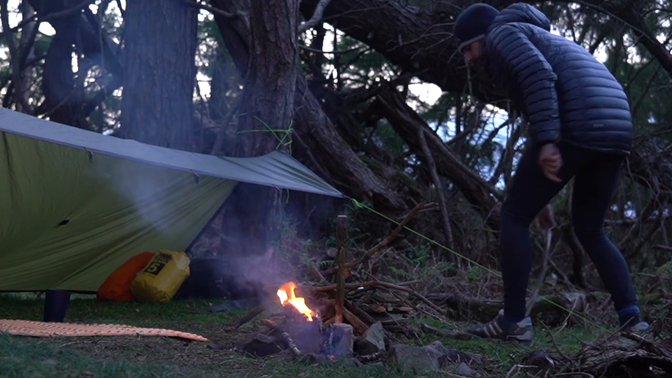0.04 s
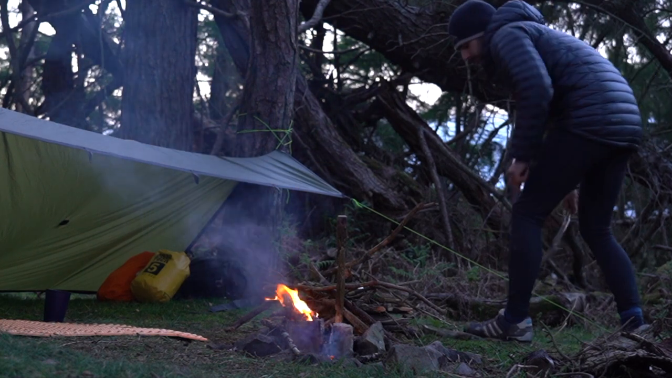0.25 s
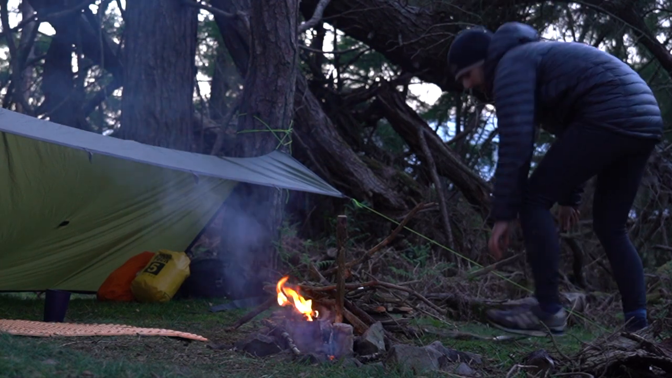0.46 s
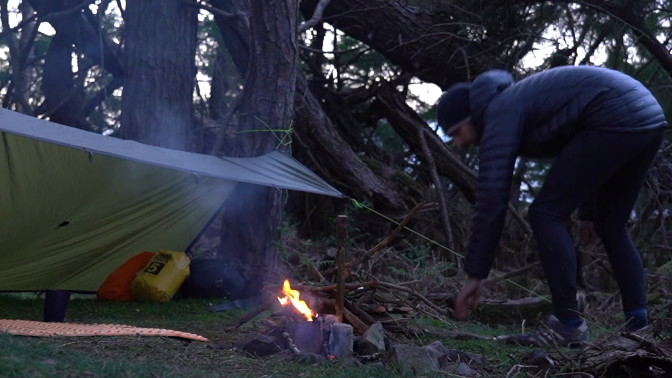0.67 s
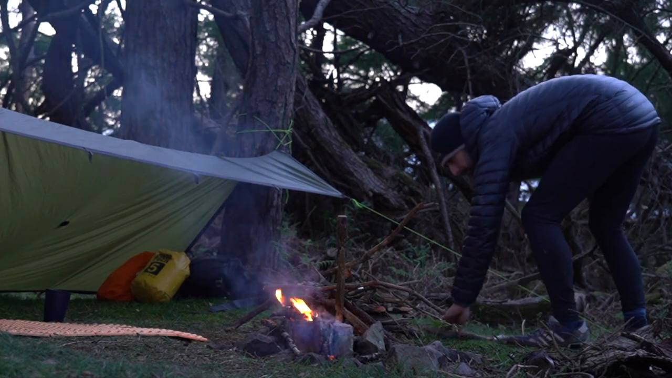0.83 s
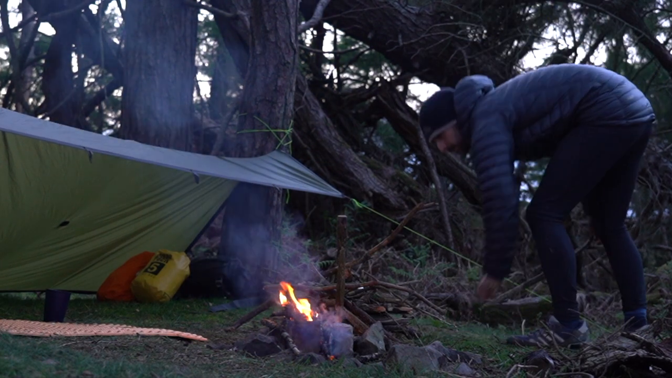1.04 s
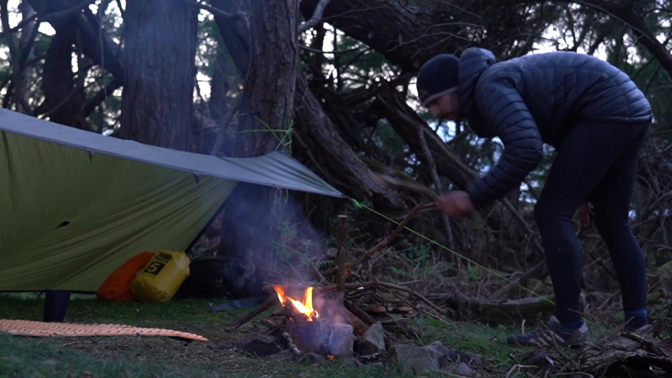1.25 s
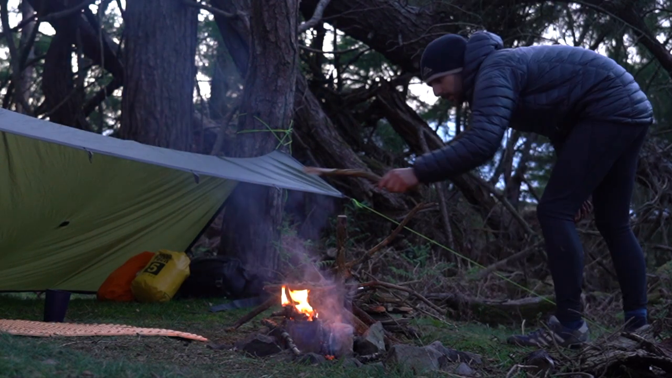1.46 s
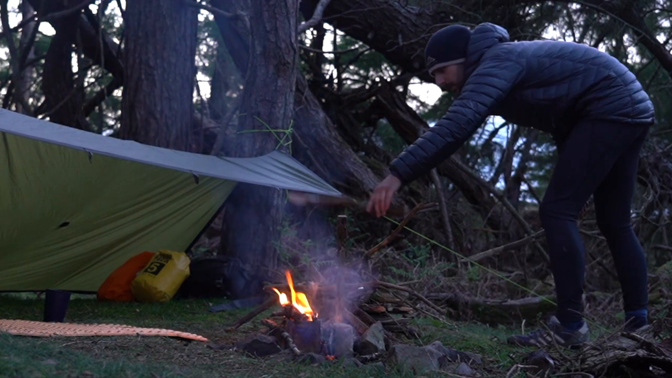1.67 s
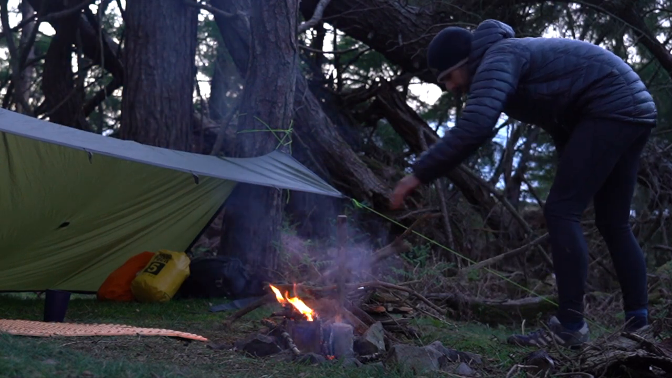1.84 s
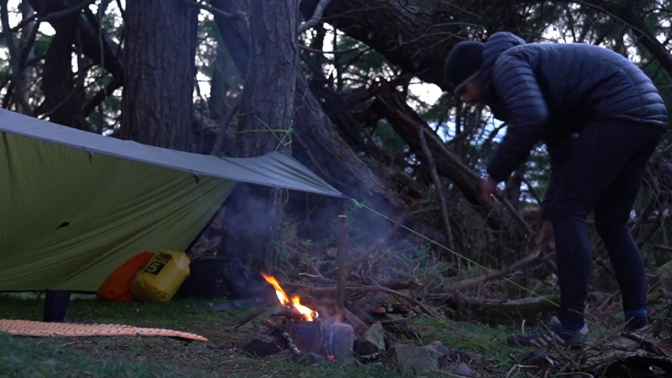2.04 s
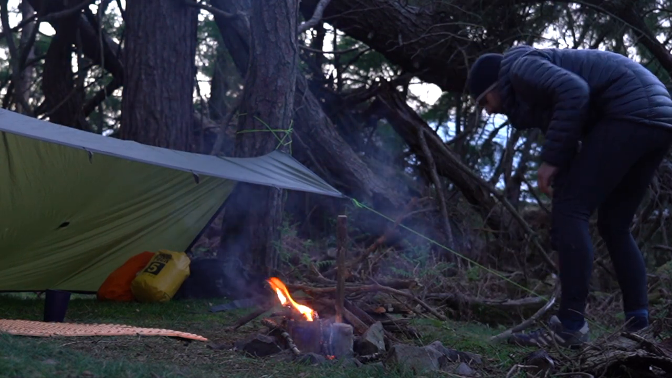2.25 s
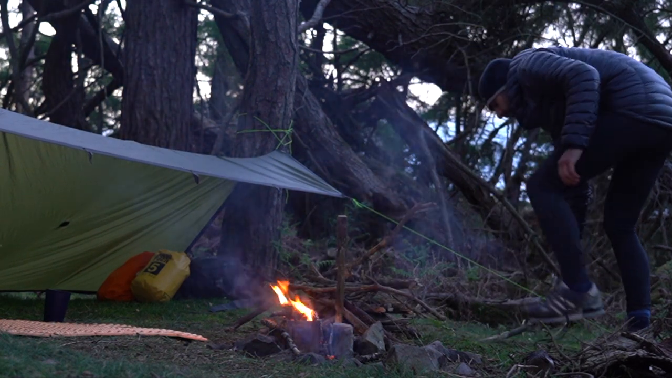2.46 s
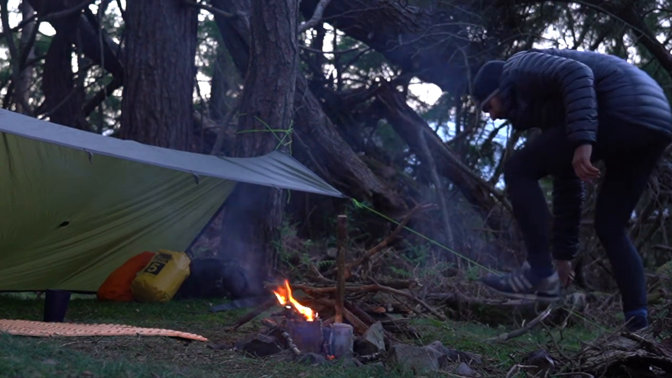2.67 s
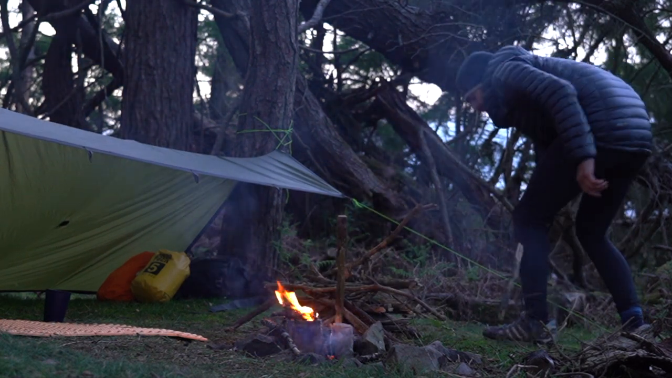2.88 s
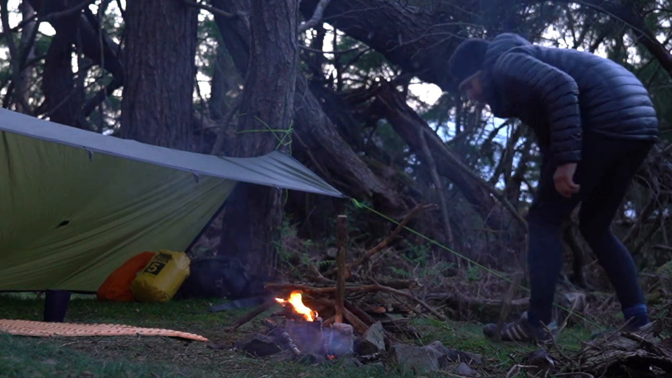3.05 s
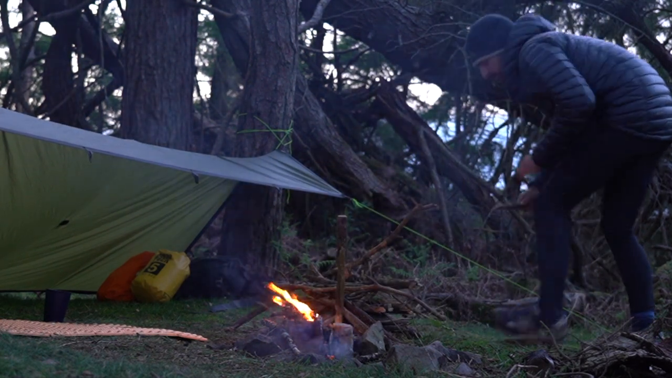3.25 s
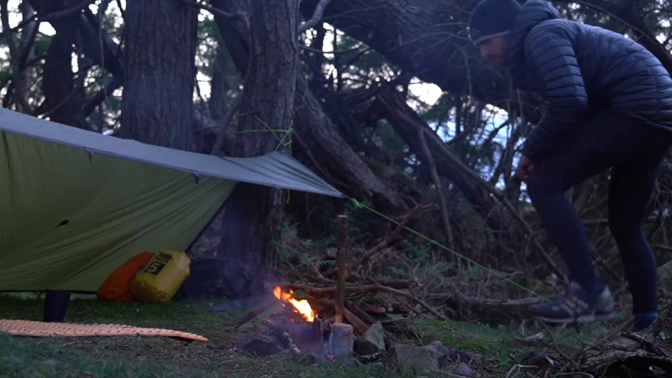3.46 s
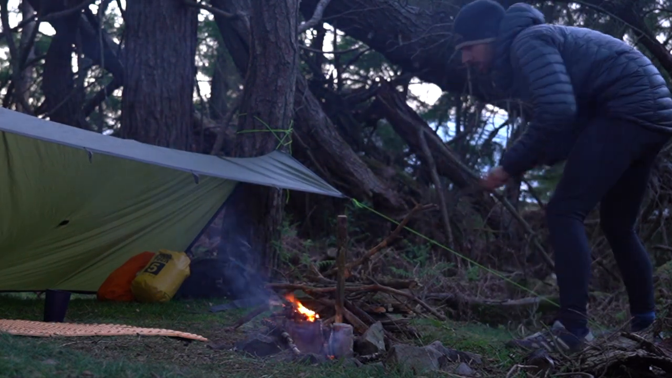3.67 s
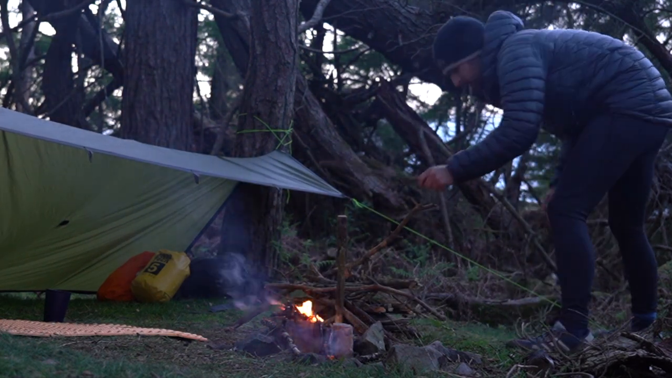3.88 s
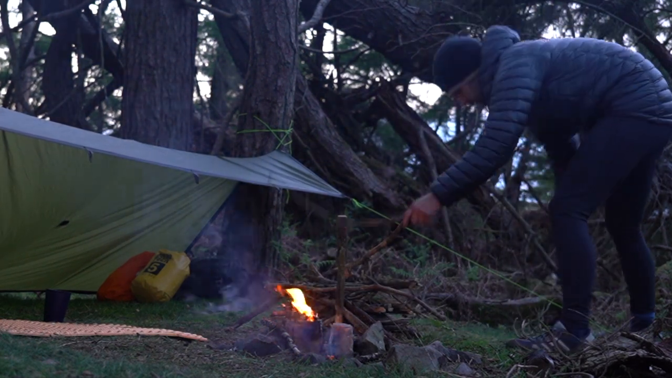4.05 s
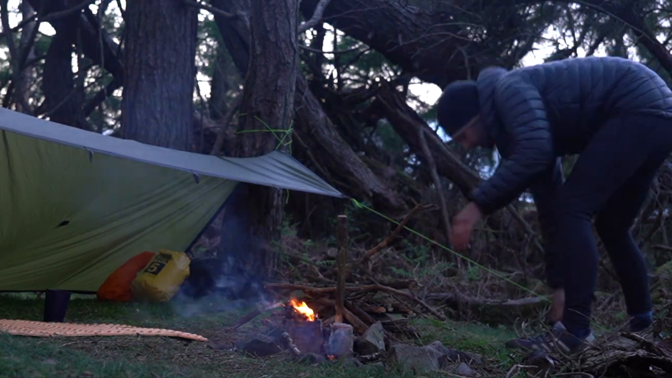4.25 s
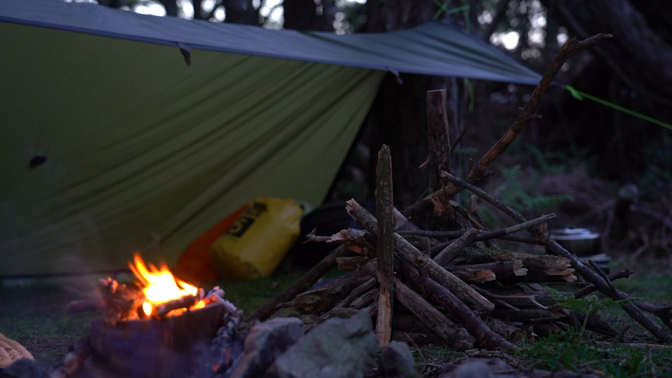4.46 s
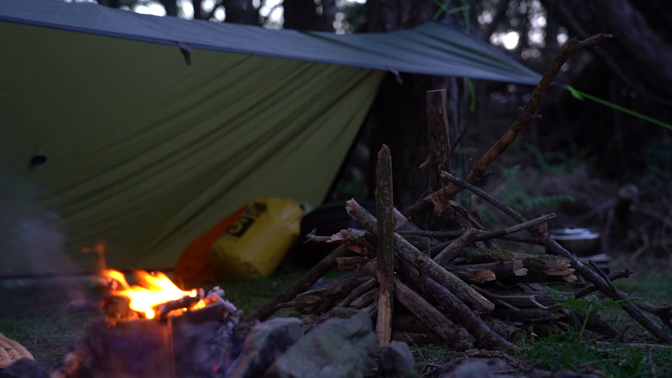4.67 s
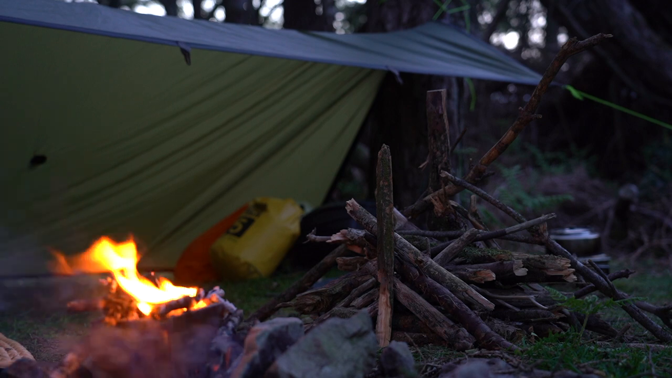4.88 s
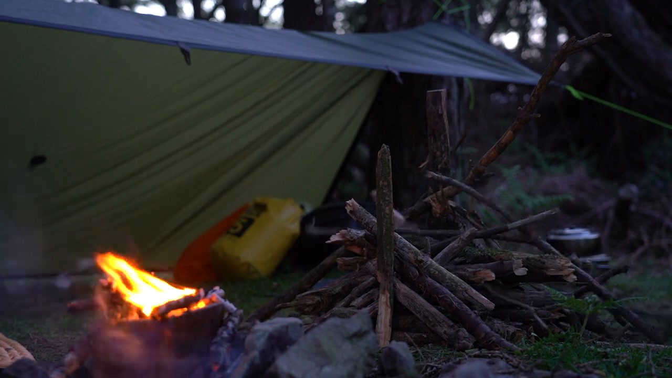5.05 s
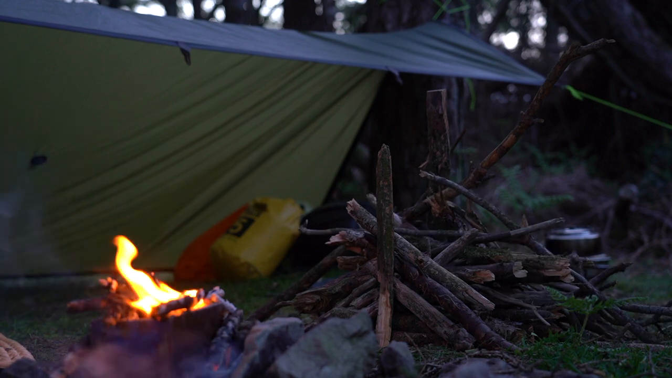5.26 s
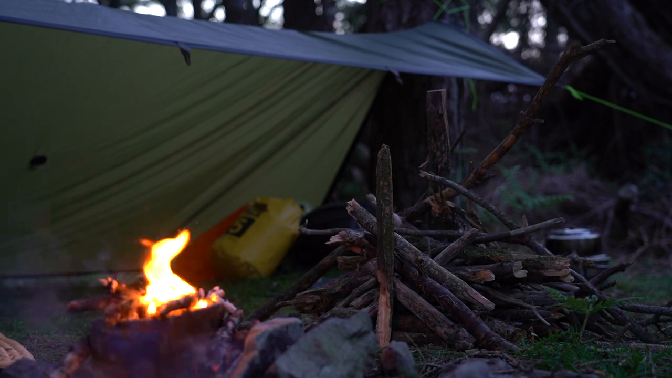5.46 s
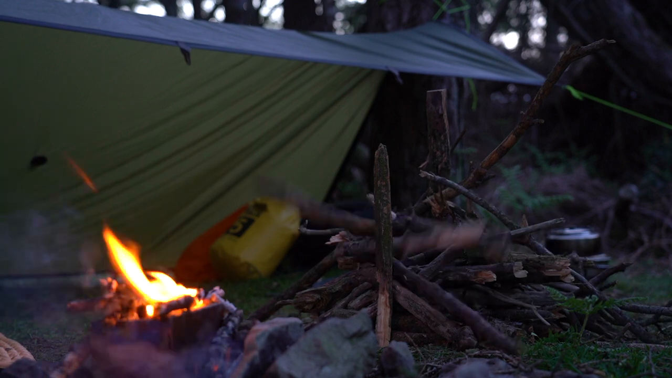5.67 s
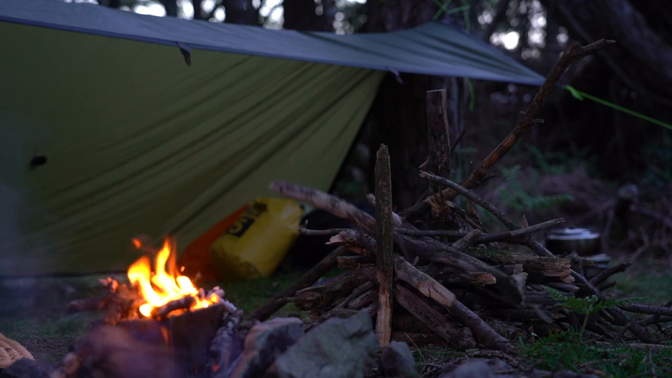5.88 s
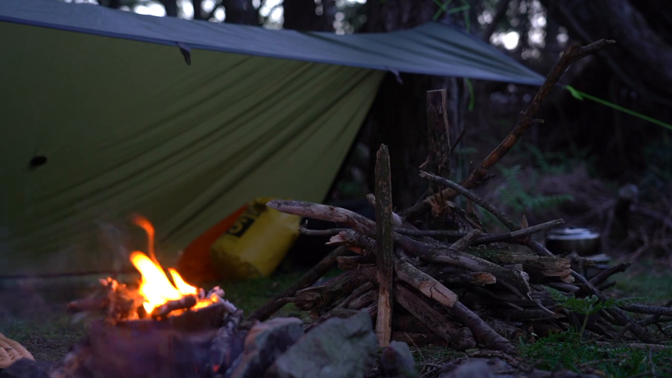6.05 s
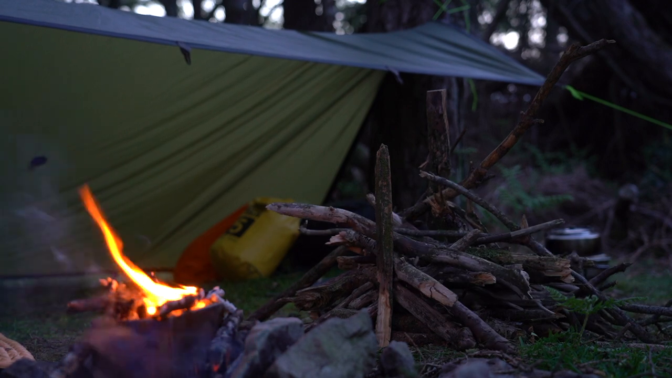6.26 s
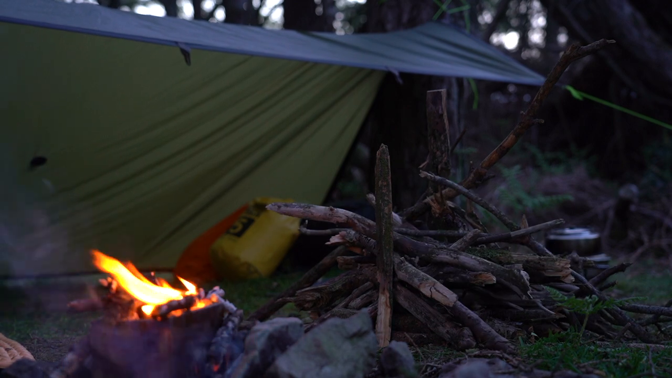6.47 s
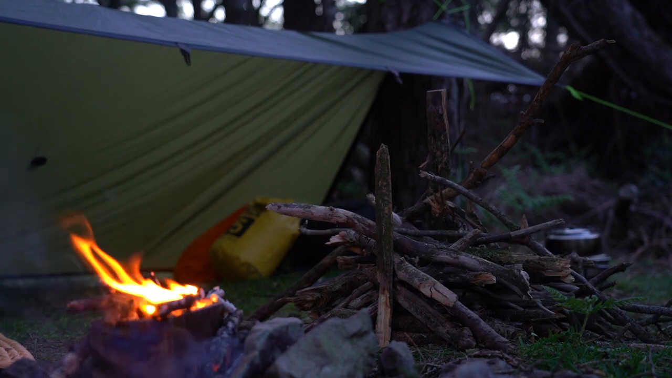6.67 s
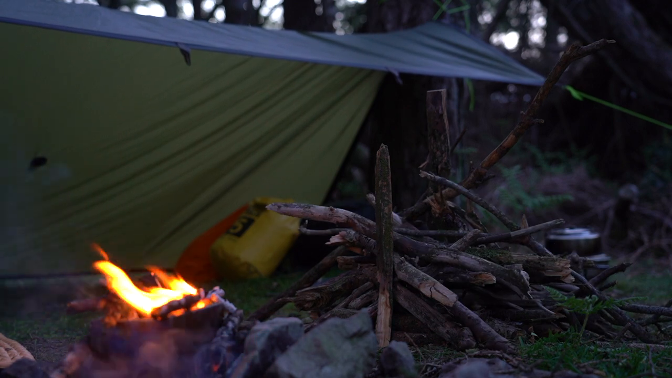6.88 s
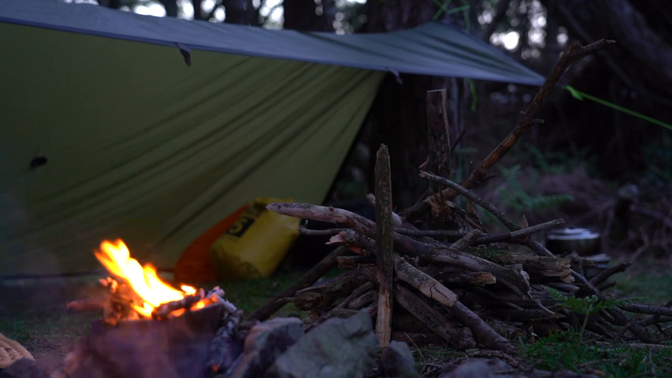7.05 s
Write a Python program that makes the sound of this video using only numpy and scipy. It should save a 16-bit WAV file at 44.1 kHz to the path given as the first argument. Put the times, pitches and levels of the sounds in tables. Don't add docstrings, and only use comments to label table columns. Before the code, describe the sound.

Dry sticks snap and clatter onto a woodpile in uneven sharp cracks, with leaf litter crunching, birds whistling and faint wind in the trees.

```python
import sys
import numpy as np
from scipy import signal
from scipy.fft import rfft, irfft
from scipy.io import wavfile

SR = 44100
rng = np.random.default_rng(int(sys.argv[2]) if len(sys.argv) > 2 else 0)


def gain_from_db(level_db):
    decades = np.asarray(level_db, float) / 20
    return 10 ** decades


def transcribe(u):
    v = np.clip(np.atleast_2d(u).T, -1, 1)
    q = np.round(v * 32767).astype(np.int16)
    wavfile.write(sys.argv[1], SR, q)


N = 313992

# time in seconds, level in dB.
GUST_CURVE = [
    (0, -36),
    (.4, -37),
    (1.3, -49),
    (2.4, -50.5),
    (4, -45),
    (4.9, -51),
    (5.4, -36),
    (5.7, -33),
    (6.2, -44.5),
    (7.12, -43),
]
# frequency in Hz, density in dB per Hz.
CROWN_SPECTRUM = [(28, -38), (43, 1), (274, 0.5), (423, -4.5), (894, -2), (1560, -14.5), (3380, -32.5),
                  (5220, -15.5), (6340, -34.5), (11900, -27), (15500, -37)]
CROWN_DB = -39.5

# frequency in Hz, density in dB per Hz.
LITTER_SPECTRUM = [(150, -4), (250, -8), (359, -7), (534, -9), (823, -2.5), (1050, -9), (3330, -8),
                   (6540, -18.5), (7900, -21), (15500, -19.5)]
# time in seconds, crunch level in dB.
STIR_CURVE = [(.28, -52), (.45, -33), (.72, -29.5), (.84, -30), (.884, -43.5), (1.016, -34), (1.3, -44),
              (1.75, -39), (2.24, -38.5), (2.74, -45.5), (3.3, -50), (3.55, -46.5), (4.15, -35), (4.7, -37),
              (5.4, -41), (6.2, -38), (6.35, -48.5), (7.12, -40)]
STIR_LEAF_DB, STIR_TWIG_DB = -17, -8.5
SMOOTH_UNTIL_S = 1.4
# start in seconds, time to sink 20 dB in seconds,
# crunch level in dB, dry leaf level in dB re crunch, twig level in dB re crunch.
DEBRIS_BURSTS = [(0, 0.4, -19, -25, -5), (0, -0.0056, -11.5, -18, -16), (1.846, 0.18, -28.5, -10, 0),
                 (1.981, 0.35, -33, -9, -7), (2.811, 0, -20, 0, 4), (4.213, 0.08, -30, 2, 0),
                 (5.038, 0.08, -25, 3.5, 7), (5.06, 0.28, -27, 0.5, -19), (5.658, 0.0455, -12.5, -6, -3),
                 (5.701, 0.17, -21.5, -5.5, -4), (5.786, 0.04, -31.5, -17, 5),
                 (5.883, 0.67, -33.5, -5, -13)]
SHUFFLE_BURSTS = [(1.016, 0.19, -48.5, 5.5, -7), (2.877, 0.16, -18.5, -2.5, 0.5),
                  (3.005, 0.42, -25.5, -16.5, -1), (3.551, 0.03, -42.5, 1.5, -10),
                  (3.65, 0.29, -39.5, -11, 3.5), (4.374, 0.077, -45, 5.5, -4),
                  (4.49, 0.034, -33.5, -5, 5.5), (4.687, 0.2, -33.5, -11, 6), (4.855, 0.042, -43.5, 5, -3),
                  (4.933, 0.19, -40.5, -4, 5), (5.144, 0.054, -24, -11, 0.5), (5.935, 0.071, -31.5, -3, -1),
                  (6.047, 0.089, -41.5, 10, -9), (6.2, 0.41, -46, 2.5, 11), (6.579, 0.29, -32.5, -9.5, -3),
                  (6.749, 0.063, -34.5, -9, 5), (6.854, 0.035, -33, -9, 1.5)]
DEBRIS_RISE_S, SHUFFLE_RISE_S = .003, 0.077
LEAF_SINKS_FASTER = 1.66

# start in seconds, length in seconds, start pitch in Hz, settled pitch in Hz, level in
# dB. The first two rows are ringing tones already dying away as the scene opens; the rest are held bird notes.
HELD_WHISTLES = [(0, 0.05, 3690, 3380, -33.5), (0, 0.035, 2240, 2170, -39), (1.782, 0.125, 2410, 2400, -54),
                 (6.4, 0.17, 2350, 2260, -57), (2.14, 0.41, 3804, 3724, -44.5),
                 (2.509, 0.036, 3700, 4900, -51), (2.582, 0.19, 4285, 4270, -44),
                 (3.714, 0.25, 2650, 2390, -55), (4.331, 0.18, 3606, 3553, -41),
                 (4.377, 0.051, 4080, 3950, -47), (4.406, 0.041, 3590, 3090, -41.5),
                 (4.479, 0.045, 2700, 2620, -41.5), (4.498, 0.023, 3640, 3350, -39),
                 (4.511, 0.045, 2890, 4360, -44), (4.808, 0.023, 3340, 3070, -47),
                 (4.594, 0.029, 3380, 3060, -40.5), (4.738, 0.0236, 3640, 3080, -39),
                 (4.871, 0.019, 3750, 3300, -41.5), (5.39, 0.2, 2060, 2117, -52.5),
                 (5.595, 0.078, 2300, 2500, -48)]
# start in seconds, start pitch in Hz, settled pitch in Hz, level in dB.
WARBLE_CHIRPS = [(1.559, 3730, 3140, -47), (1.652, 3680, 3030, -45), (1.75, 3360, 2940, -40.5),
                 (2.565, 4630, 4230, -49), (4.288, 2620, 2580, -48), (4.48, 6400, 6750, -47),
                 (4.572, 4640, 4730, -39), (4.709, 3730, 3480, -43), (4.856, 4650, 4400, -45),
                 (4.932, 4020, 4120, -45), (4.942, 3390, 3230, -47), (5.008, 3380, 3330, -45)]
CHIRP_S, NOTE_FADE_DB_PER_S = 0.021, 31
# start in seconds, length in seconds, pitch in Hz, level in dB.
BUZZY_TRILLS = [
    (1.994, 0.1, 3300, -38.5),
    (2.481, .025, 3390, -40),
]
TRILL_BEAT_S, TRILL_FALL, TRILL_FADE_DB_PER_S = .0115, 1.2, 70
# start in seconds, length in seconds, start pitch in Hz,
# end pitch in Hz, level in dB.
WARBLE_SWEEPS = [(2.106, 0.054, 4110, 3740, -48), (2.419, 0.022, 3950, 5330, -46),
                 (4.481, 0.023, 4900, 6340, -38), (4.559, 0.013, 4980, 4030, -38),
                 (4.584, 0.015, 4500, 3250, -39), (4.641, 0.011, 4080, 3450, -34.5),
                 (4.65, 0.0154, 3570, 4450, -42), (4.661, .01, 3600, 2920, -37),
                 (4.721, 0.013, 4200, 4750, -48), (4.731, 0.0086, 4750, 4200, -36),
                 (4.787, 0.0116, 4550, 3500, -40), (4.8, 0.012, 3620, 4200, -36),
                 (4.808, .012, 4230, 3700, -40), (4.83, .014, 3110, 3350, -43.5)]

# time in seconds, peak in dB, pitch in Hz.
FIBRE_CHIPS = [(0.1178, -15.5, 1810), (0.2251, -19, 3220), (0.2997, -29, 2760), (0.3142, -22, 2440),
               (0.3644, -24, 3050), (0.454, -25, 2720), (0.525, -22, 2930), (0.5959, -27, 3270),
               (0.617, -32, 3030), (0.721, -18, 2900), (0.8457, -22, 2320), (1.0096, -41, 2150),
               (1.8453, -10, 4850), (2.128, -29, 3190), (2.387, -28, 3620), (2.7929, -27, 3270),
               (2.8038, -23, 2840), (2.858, -18, 4500), (2.8847, -4, 3300), (2.897, -13, 3060),
               (2.959, -15, 3330), (2.974, -15.5, 3450), (3.005, -18, 2480), (3.011, -17.5, 3600),
               (3.0212, -24, 2070), (3.101, -21, 3270), (3.178, -40, 2580), (3.2317, -30, 1810),
               (3.3114, -25, 2930), (3.341, -13, 2900), (3.3748, -24, 3010), (3.426, -25, 2617),
               (3.622, -28, 2930), (4.189, -18, 2760), (4.2181, -5, 2820), (4.2525, -18, 5300),
               (4.2646, -25, 5430), (4.7631, -25, 4940), (4.918, -29, 2850), (4.9663, -24, 2420),
               (5.025, -11, 1560), (5.0447, -14, 2600), (5.091, -19, 3000), (5.098, -12.5, 4930),
               (5.1074, -13, 3250), (5.172, -36, 5200), (5.668, -25, 3450), (5.71, -14, 4300),
               (5.7546, -17, 2070), (5.767, -20, 2410), (5.9066, -19, 3400), (6.069, -28, 1720),
               (6.2428, -27, 2150), (6.565, -33, 3380), (6.6765, -22, 1640), (6.8557, -22, 1970),
               (6.8706, -24, 3760), (7.089, -31, 2070)]
# time in seconds, peak in dB, pitch in Hz.
BARK_FLAKES = [(0.0584, -25, 8010), (0.4718, -36, 8100), (0.6626, -36, 11890), (1.1932, -34, 12490),
               (1.7044, -39, 7920), (1.7635, -36, 11100), (1.851, -16.5, 9300), (1.8673, -21, 14040),
               (1.8899, -37, 11200), (1.9703, -31, 13520), (2.0091, -31, 9130), (2.0205, -38, 9990),
               (2.0672, -34, 11020), (2.0746, -38, 12920), (2.2466, -33, 10770), (2.6235, -36, 12830),
               (2.7465, -41, 10340), (2.803, -15, 9390), (2.8313, -20, 12320), (2.9177, -18, 12920),
               (2.951, -17, 7900), (2.9725, -42, 9560), (3.0395, -27, 7750), (3.0453, -20, 8100),
               (3.1065, -34, 11460), (3.3455, -31, 7490), (4.1996, -25, 8440), (4.2088, -29, 14810),
               (4.227, -23, 7060), (4.5145, -36, 8270), (4.5252, -29, 14640), (4.7036, -39, 8350),
               (4.7177, -39, 10680), (4.7287, -35, 7750), (4.7632, -45, 10340), (4.9497, -33, 8530),
               (5.0432, -20, 9040), (5.204, -36, 8100), (5.2574, -28, 12600), (5.2738, -35, 8610),
               (5.4213, -34, 10770), (5.7162, -18, 9910), (5.7742, -31, 11200), (5.7954, -32, 11540),
               (5.804, -37, 9820), (6.3358, -36, 8100), (6.3968, -31, 14640), (6.416, -30, 11000),
               (6.5628, -18, 11400), (6.735, -16, 13950), (6.7516, -30, 7000), (6.7676, -28, 11280),
               (6.8693, -32, 9600), (6.9704, -29, 10940)]
# time in seconds, peak in dB, pitch in Hz.
STICK_PARTINGS = [
    (1.98, -3.5, 3100),
    (2.476, -25, 13200),
    (2.8339, 7.5, 4700),
    (3.08, -2.5, 5300),
    (3.33, -8, 5260),
    (4.2555, -5, 5400),
    (5.0557, -5, 5200),
    (5.0663, -15, 5400),
    (5.6509, -11, 4400),
    (5.703, -3.5, 4700),
]
# T60 of the click in seconds, cycles of its ring.
CHIP, FLAKE, PARTING = (0.0036, 12.4), (0.011, 11), (0.002, 16)

# time in seconds, peak in dB, brightest frequency in Hz.
TWIG_TICKS = [(.0834, -29.5, 9500), (.4349, -27, 6000), (.719, -28, 6950), (1.097, -28, 5600),
              (1.6856, -31, 9200), (1.9426, -26, 11000), (2.2127, -25, 5160), (2.611, -21.5, 14000),
              (3.2745, -36, 5040), (3.6068, -26, 5300), (4.1735, -29.5, 9800), (4.5281, -27, 10900),
              (4.7504, -30, 5090), (4.9663, -24, 13400), (5.217, -26.5, 9400), (5.2683, -28, 8500),
              (5.723, -12, 11700), (5.8424, -26.5, 6840), (5.9194, -28, 9400), (6.4118, -26, 11400),
              (6.6542, -24, 9400), (6.805, -27, 10000), (6.8142, -17.5, 11600), (6.8409, -36, 9000),
              (6.9644, -28, 4760), (7.0876, -28.5, 11600)]
# time in seconds, peak in dB, brightest frequency in Hz.
MORE_TWIG_TICKS = [(0.298, -43, 9200), (.3641, -42, 8600), (.462, -32.5, 10000), (.6, -37, 12000),
                   (.9073, -36, 6900), (1.1835, -30, 13000), (1.235, -33, 11000), (1.9101, -36, 12000),
                   (2.098, -36, 9500), (2.385, -44, 8540), (3.3115, -33, 7100), (4.4533, -33, 8500),
                   (4.612, -25, 4830), (5.3991, -31, 11500), (6.069, -31, 8500), (6.118, -25, 5000),
                   (6.192, -32, 13300), (6.6428, -29, 10000)]

# time in seconds, crack peak in dB,
# brightest frequency in Hz, body level in dB re crack.
STICK_SPLITS = [(1.737, -23, 3470, -8), (1.8415, -23, 3350, -18), (1.8475, -13, 2300, -13),
                (2.809, -6, 4800, -10), (2.834, 1.5, 2640, -5), (2.9492, -16.5, 3250, -1),
                (4.185, -19.5, 2540, -6.5), (4.5813, -16.5, 6100, -8), (4.919, -24, 3060, -12),
                (5.0385, -9, 3420, -15), (5.0556, -5, 1760, -5), (5.1566, -24, 2100, -10),
                (6.5628, -20, 3640, -21), (6.688, -18.5, 4800, -11), (6.732, -14, 2200, -7)]
STICK_BREAKS = [(.5849, -28, 1670, 6.5), (2.1962, -21, 3580, -29), (2.476, -24.5, 3600, -27),
                (2.9095, -9.5, 3040, -20), (2.9178, -12, 4760, -4), (2.974, -41, 2500, -12.6),
                (3.0736, -11, 3560, -35), (3.0792, -10, 3380, -37), (3.3305, -14, 3200, -7),
                (3.6562, -33, 3170, 8), (4.2548, -13, 5300, -24), (5.0247, -15.5, 3280, -4),
                (5.1317, -20, 3180, -26), (5.6506, -10.5, 3300, 0), (5.6747, -9, 1600, -5.5),
                (5.6961, -5.5, 2560, -24), (5.7015, -5.5, 3000, -10.5), (5.9317, -18, 1690, -2.5),
                (6.745, -18, 1890, -7), (6.7633, -25, 2180, 0)]
STICK_SNAPS = [(1.8507, -9.5, 3270, -0.5), (1.9789, -7.5, 3180, -10), (2.2308, -17, 5650, -9),
               (2.8124, -14.5, 4700, 6), (2.873, -10, 3270, -8), (3.0405, -15.5, 2700, -22),
               (3.1767, -29.5, 3500, 2), (3.6387, -23, 2280, -8), (4.2383, -13, 4600, -13),
               (5.0665, -4, 1840, -11), (5.0703, -5, 1700, -15), (5.1175, -11, 3240, -25),
               (5.6819, -4, 2760, -9), (5.7497, -4.5, 1840, -19), (6.7204, -20, 3300, -12),
               (6.861, -15.5, 4500, -12)]
STICK_KNOCKS = [(1.984, -15.5, 3000, -8), (2.2668, -21.5, 3360, -35), (2.828, -14, 2470, -6),
                (2.8653, -12, 3340, -10), (4.2089, -19, 3750, -39), (4.2182, -13.5, 1710, -11),
                (4.2271, -11, 3000, -9), (5.0501, -9, 2700, -10), (5.7461, -13, 3520, 0),
                (5.7843, -20, 3230, -21), (5.7927, -10.5, 2660, -4), (5.8825, -21, 2660, -14),
                (6.7523, -14.5, 2650, -18)]
# splinter level in dB re crack, T60 in seconds.
SPLIT, BREAK, SNAP, KNOCK = (0.38, 0.005), (-5, 0.021), (-14, 0.0046), (-12, 0.028)

# time in seconds, peak in dB, pitch in Hz.
GROUND_THUDS = [(0.59, -25.5, 230), (1.733, -23.5, 282), (1.842, -19.5, 235), (1.985, -26, 195),
                (2.015, -25, 300), (2.293, -26.5, 148), (2.804, -9, 282), (2.838, -18, 347),
                (2.858, -19, 110), (2.899, -13.5, 367), (2.951, -17.5, 325), (3.02, -27, 320),
                (3.111, -23, 141), (3.145, -19.5, 256), (3.331, -26, 234), (3.6525, -21, 126),
                (3.676, -32, 133), (4.216, -20, 340), (4.442, -34, 189), (4.708, -24.5, 176),
                (5.041, -20, 207), (5.061, -29, 181), (5.14, -23.5, 72), (5.654, -19, 355),
                (5.686, -16.5, 209), (5.764, -14.5, 284), (5.796, -20, 197), (5.933, -30, 370)]
# time in seconds, peak in dB, pitch in Hz,
# T60 in seconds.
STICK_RINGS = [(1.848, -14, 626, 0.027), (1.853, -19, 1690, 0.074), (1.983, -12.5, 1695, 0.075),
               (1.982, -20, 2213, 0.037), (3.042, -20, 335, 0.12), (3.1767, -16.5, 835, 0.019),
               (3.333, -14.5, 226, 0.076), (3.6385, -14, 780, 0.037), (3.6565, -13.5, 625, 0.028),
               (5.651, -7.5, 1250, 0.014), (5.6508, -4, 2330, 0.018), (5.701, -3, 1100, 0.011),
               (5.702, -10, 2500, 0.054), (5.7464, -4, 1895, 0.025), (6.7204, -19.5, 970, 0.035),
               (6.7543, -20, 910, 0.032)]
RING_RISE_S = 0.0004

NEAR_T60_S, NEAR_DB = 0.013, 1
MIC_PEAK_HZ, MIC_WIDTH_HZ, MIC_PEAK_DB = 3370, 280, 3
CUTOFF_HZ = 16200


def peak_one(x):
    return x / (np.abs(x).max() + 1e-12)


def rms_one(x):
    return x / np.sqrt(np.mean(x ** 2) + 1e-20)


def in_time(rows):
    s, *columns = np.transpose(rows)
    return [np.interp(np.arange(N) / SR, s, c) for c in columns]


def band(x, low_hz, high_hz):
    sos = signal.butter(2, [low_hz, min(high_hz, .45 * SR)], "band", fs=SR, output="sos")
    return signal.sosfilt(sos, x)


def coloured(x, spectrum):
    hz, db = np.transpose(spectrum)
    grid = np.arange(1, N // 2 + 2) * SR / N
    gain = gain_from_db(np.interp(np.log(grid), np.log(hz), db))
    return rms_one(irfft(rfft(x) * gain, N))


def drift(rate_hz):
    step_hz = 200
    steps = rng.standard_normal(int(N / SR * step_hz) + 2)
    r = np.exp(-2 * np.pi * rate_hz / step_hz)
    smooth = rms_one(signal.lfilter([1], [1, -2 * r, r * r], steps))
    return np.interp(np.arange(N) * step_hz / SR, np.arange(len(steps)), smooth)


def ring(x, hz, t60):
    r = gain_from_db(-60 / (t60 * SR))
    w = 2 * np.pi * hz / SR
    return signal.lfilter([0, np.sin(w)], [1, -2 * r * np.cos(w), r * r], x)


def scatter(x, t60):
    t = np.arange(round(.4 * SR)) / SR
    answer = rng.standard_normal(len(t)) * gain_from_db(-60 * t / t60)
    return signal.fftconvolve(x, answer / np.sqrt(np.sum(answer ** 2)))[:N]


def add(out, s, sound):
    i = round(s * SR)
    out[i:i + len(sound)] += sound[:N - i]


def air():
    hush = gain_from_db(CROWN_DB + .8 * drift(1.5)) * coloured(rng.standard_normal(N), CROWN_SPECTRUM)
    gust_db, = in_time(GUST_CURVE)
    rumble = rms_one(band(band(rng.standard_normal(N), 13.4, 56), 13.5, 61))
    return hush + gain_from_db(gust_db - 4.5 + 2.4 * drift(7.0)) * rumble


def litter_levels():
    t = np.arange(N) / SR
    stir_db, = in_time(STIR_CURVE)
    power = gain_from_db(2 * (stir_db + np.array([[0], [STIR_LEAF_DB], [STIR_TWIG_DB]])))
    for rise_s, rows in ((DEBRIS_RISE_S, DEBRIS_BURSTS), (SHUFFLE_RISE_S, SHUFFLE_BURSTS)):
        for s, sink_s, db, leaf_db, twig_db in rows:
            near = slice(max(0, round((s - 4 * rise_s) * SR)), round((s + 4 * sink_s) * SR))
            climbing = (s - t[near]) / rise_s
            sinking = (t[near] - s) / max(sink_s, .01) * np.array([[1], [LEAF_SINKS_FASTER], [1]])
            burst_db = db + np.array([[0], [leaf_db], [twig_db]])
            power[:, near] += gain_from_db(2 * (burst_db - 20 * np.maximum(climbing, sinking)))
    return 10 * np.log10(power)


def snaps(per_s, low_hz, high_hz, cycles):
    sizes = gain_from_db(2.4 * np.minimum(rng.exponential(1, N), 4.5)) * rng.choice([-1, 1], N)
    born = sizes * (rng.random(N) < per_s * gain_from_db(5.0 * drift(25)) / SR) + 1e-18
    dealt = rng.integers(0, 10, N)
    modes = enumerate(np.geomspace(low_hz, high_hz, 10))
    return rms_one(sum(ring(born * (dealt == k), hz, cycles / hz) for k, hz in modes))


def litter():
    crunch_db, leaf_db, twig_db = litter_levels()
    stir = np.clip((crunch_db + 47.5) / 14, 0, 1.5)
    stir = stir * np.where(np.arange(N) < SMOOTH_UNTIL_S * SR, .3, 1)
    layers = ((twig_db - 5.5, 250, 1300, .7, 500),
              (crunch_db - 4.0, 1200, 6200, .9, 1500),
              (leaf_db, 5500, 15800, 1.1, 2000))
    out = 0
    for db, low_hz, high_hz, grain, per_s in layers:
        friction = rng.standard_normal(N) * gain_from_db((0.64 + 3.0 * stir) * drift(15.4))
        rubbing = rms_one(band(coloured(friction, LITTER_SPECTRUM), low_hz, high_hz))
        grains = coloured(snaps(per_s, low_hz, high_hz, cycles=7.2), LITTER_SPECTRUM)
        share = grain * stir
        out = out + gain_from_db(db) * (rubbing + share * grains) / np.sqrt(1 + share ** 2)
    return out


def bird_notes():
    chirps = [(s, CHIRP_S, *rest) for s, *rest in WARBLE_CHIRPS]
    beats = []
    for s, length, hz, db in BUZZY_TRILLS:
        for t in np.arange(0, length, TRILL_BEAT_S):
            start_hz, settled_hz = hz * TRILL_FALL, hz / np.sqrt(TRILL_FALL)
            beats.append((s + t, TRILL_BEAT_S, start_hz, settled_hz, db - TRILL_FADE_DB_PER_S * t))
    return HELD_WHISTLES + chirps + beats


def birds():
    out = np.zeros(N)
    waver = 1 + .007 * drift(90)
    notes = [(*note, False) for note in bird_notes()] + [(*note, True) for note in WARBLE_SWEEPS]
    for s, length, start_hz, end_hz, db, straight in notes:
        t = np.arange(round(length * SR)) / SR
        left = 1 - t / length if straight else np.exp(-t / (.36 * length))
        hz = (end_hz + (start_hz - end_hz) * left) * waver[round(s * SR):][:len(t)]
        swell = np.minimum(1, np.minimum(t / .003, (length - t) / (.003 + .2 * length)))
        tone = np.sin(2 * np.pi * np.cumsum(hz) / SR)
        add(out, s, gain_from_db(db + 6.0 - NOTE_FADE_DB_PER_S * t) * swell * tone)
    out = out * gain_from_db(3 * drift(70))
    return out + gain_from_db(.3) * scatter(band(out, 2000, 4100), .3)


def crackle():
    out, t = np.zeros(N), np.arange(1024) / SR
    kinds = ((FIBRE_CHIPS, CHIP), (BARK_FLAKES, FLAKE), (STICK_PARTINGS, PARTING))
    rows = [(*row, *shared) for table, shared in kinds for row in table]
    chance = rng.standard_normal((len(rows), len(t)))
    for (s, db, hz, t60, cycles), noise in zip(rows, chance):
        click = noise * gain_from_db(-60 * t / t60)
        octave = peak_one(band(band(click, .5 * hz, 1.86 * hz), .5 * hz, 1.86 * hz))
        ringing = peak_one(ring(click, hz, cycles / hz))
        add(out, s, gain_from_db(db) * peak_one(octave + 3.8 * ringing))
    return out


def ticks():
    out, t = np.zeros(N), np.arange(1024) / SR
    rows = TWIG_TICKS + MORE_TWIG_TICKS
    chance = rng.standard_normal((len(rows), len(t)))
    for (s, db, hz), noise in zip(rows, chance):
        click = noise * gain_from_db(-60 * t / 0.0063)
        ringing = peak_one(ring(click, hz, 20.0 / hz))
        add(out, s, gain_from_db(db) * peak_one(peak_one(band(click, 3800, 10600)) + 1.6 * ringing))
    return out


def cracks():
    out, t = np.zeros(N), np.arange(4096) / SR
    kinds = ((STICK_SPLITS, SPLIT), (STICK_BREAKS, BREAK), (STICK_SNAPS, SNAP), (STICK_KNOCKS, KNOCK))
    rows = [(*row, *shared) for table, shared in kinds for row in table]
    chance = rng.standard_normal((len(rows), 3, len(t)))
    for (s, db, hz, body_db, splinter_db, t60), (noise, fine, uneven) in zip(rows, chance):
        t60 = np.clip(t60, .003, .1)
        dying = gain_from_db(6.3 * uneven - 60 * t / t60) * np.minimum(1, t / 0.00038)
        spray = noise * dying
        short_ring = peak_one(ring(spray, hz, 6.5 / hz))
        long_ring = peak_one(ring(spray, hz, 2.2 * t60))
        struck = peak_one(spray) + 3.0 * short_ring + .5 * long_ring
        bend_hz = 900 * gain_from_db(1.5 * uneven[0])
        bending = peak_one(ring(spray, bend_hz, .9 * t60))
        crack = peak_one(band(struck, 1660, 5200))
        splinter = peak_one(band(fine * dying, 2500, 13800))
        body = peak_one(band(peak_one(spray) + 0.13 * bending, 500, 980))
        add(out, s, gain_from_db(db) * (crack + gain_from_db(splinter_db) * splinter + gain_from_db(body_db) * body))
    return out


def thuds():
    out, t = np.zeros(N), np.arange(8192) / SR
    chance = rng.standard_normal((len(GROUND_THUDS), len(t)))
    for (s, db, hz), noise in zip(GROUND_THUDS, chance):
        push = band((1 + 3.8 * noise) * t * np.exp(-t / 0.004), 0.67 * hz, 4.2 * hz)
        low, upper = ring(push, hz, 0.016 + 7.9 / hz), ring(push, 1.44 * hz, 0.032)
        add(out, s, gain_from_db(db) * peak_one(low + 0.57 * upper))
    return out


def rings():
    out, t = np.zeros(N), np.arange(4096) / SR
    for s, db, hz, t60 in STICK_RINGS:
        envelope = gain_from_db(db - 60 * t / t60) * np.minimum(1, t / RING_RISE_S)
        add(out, s, envelope * np.sin(2 * np.pi * hz * t))
    return out


def scene():
    wood = cracks() + ticks() + rings()
    wood = wood + gain_from_db(NEAR_DB) * scatter(band(wood, 1500, 5500), NEAR_T60_S)
    return (wood + thuds() + litter() + birds() + air() + crackle())[None]


def roll_off(x):
    return signal.sosfilt(signal.butter(12, 15800, fs=SR, output="sos"), x)


def record(dry):
    r = np.exp(-np.pi * MIC_WIDTH_HZ / SR)
    w = 2 * np.pi * MIC_PEAK_HZ / SR
    peak = signal.lfilter(np.array([1, 0, -1]) * (1 - r * r) / 2, [1, -2 * r * np.cos(w), r * r], dry)
    full = np.clip(dry + (gain_from_db(MIC_PEAK_DB) - 1) * peak, -.95, .95)
    mix = signal.sosfilt(signal.butter(16, CUTOFF_HZ, fs=SR, output="sos"), full)
    return roll_off(mix)


dry = scene()
out = record(dry)
transcribe(out)
```